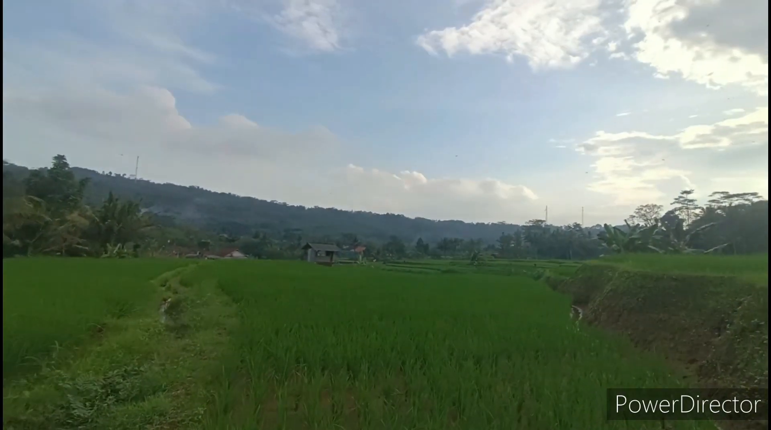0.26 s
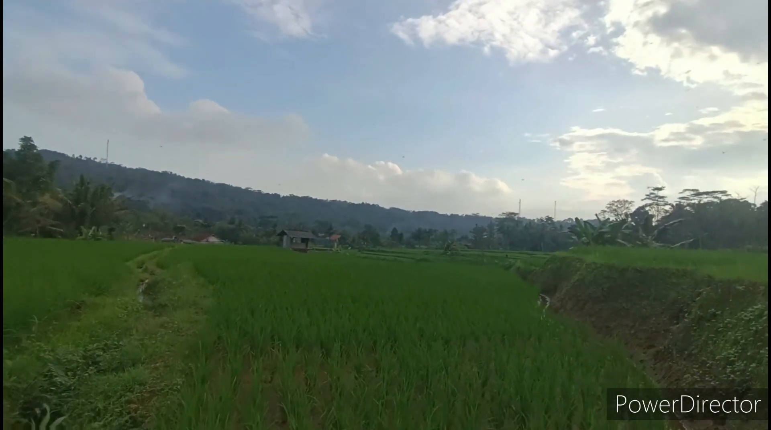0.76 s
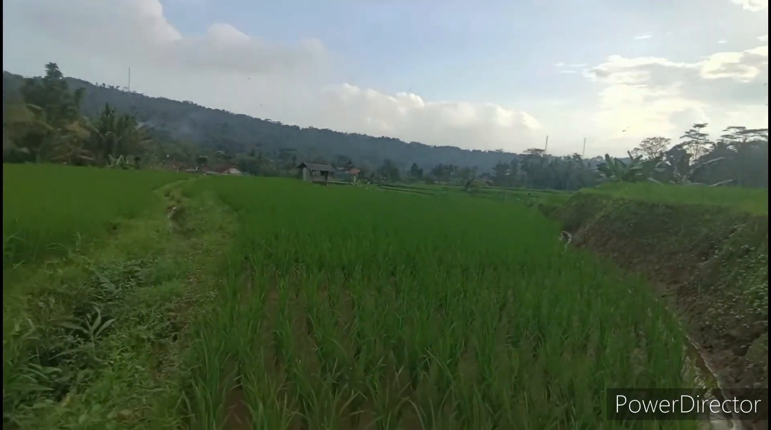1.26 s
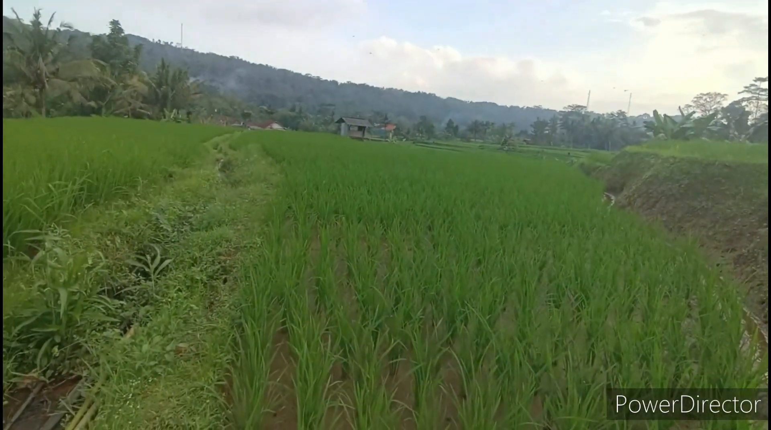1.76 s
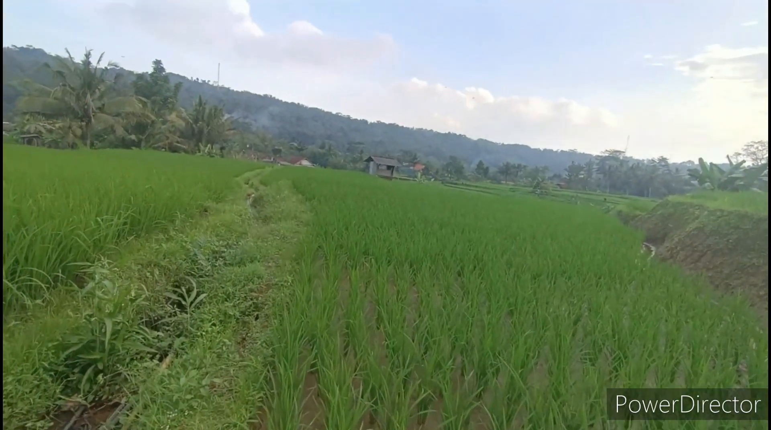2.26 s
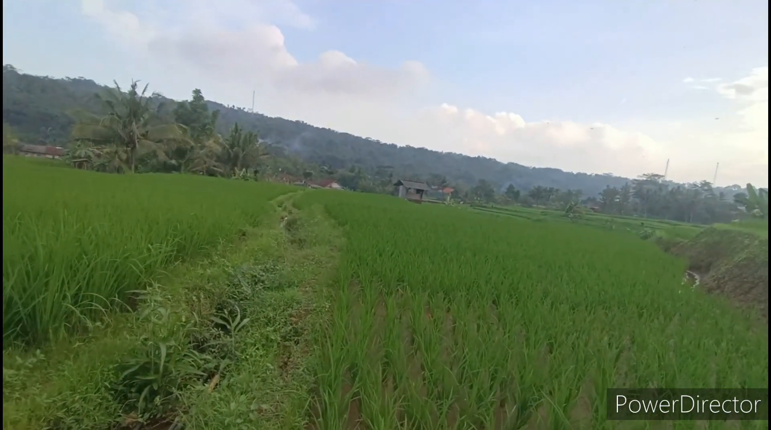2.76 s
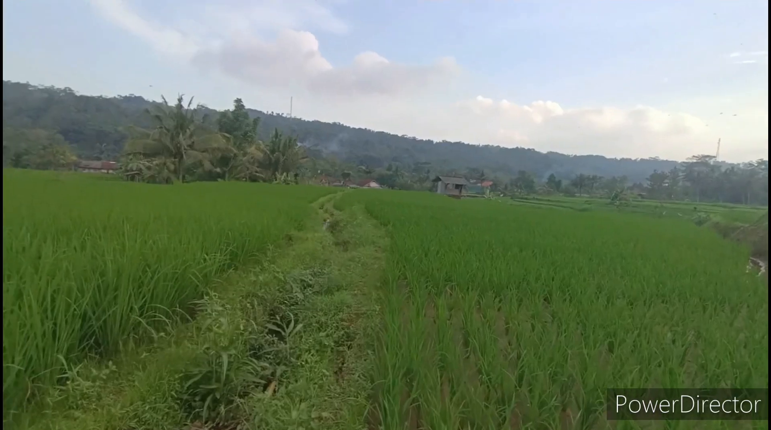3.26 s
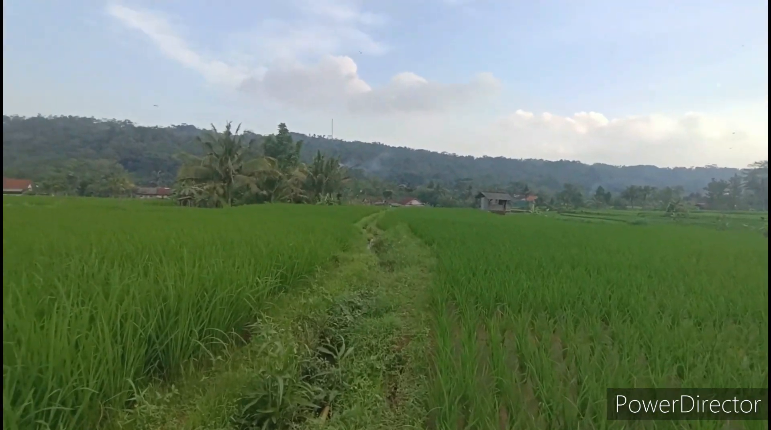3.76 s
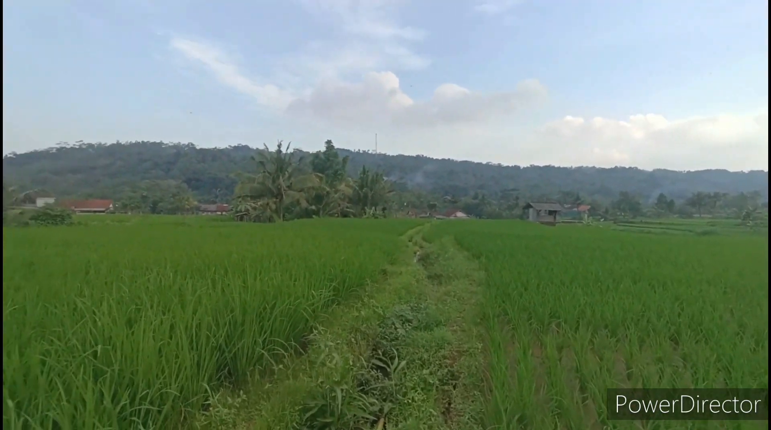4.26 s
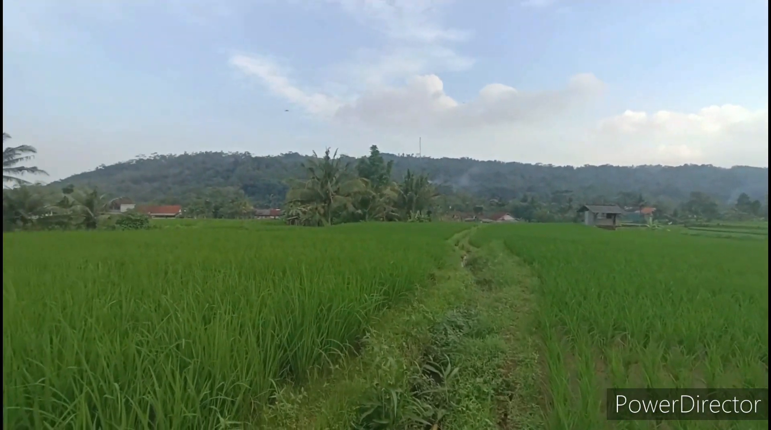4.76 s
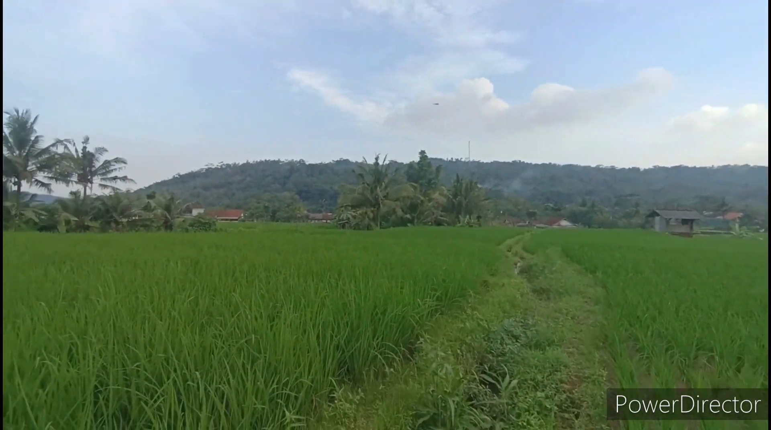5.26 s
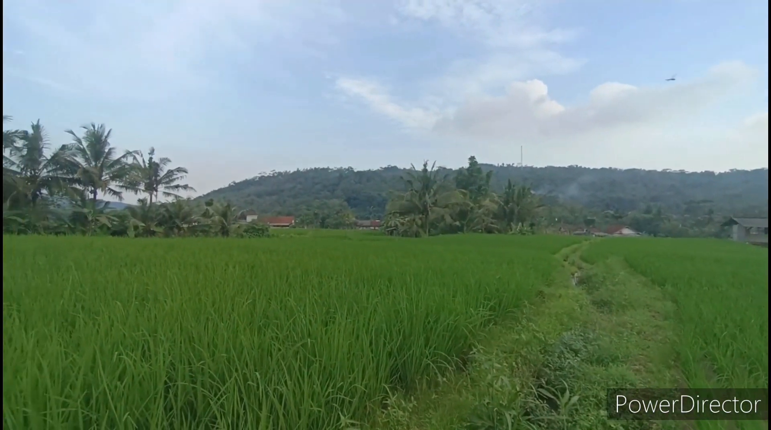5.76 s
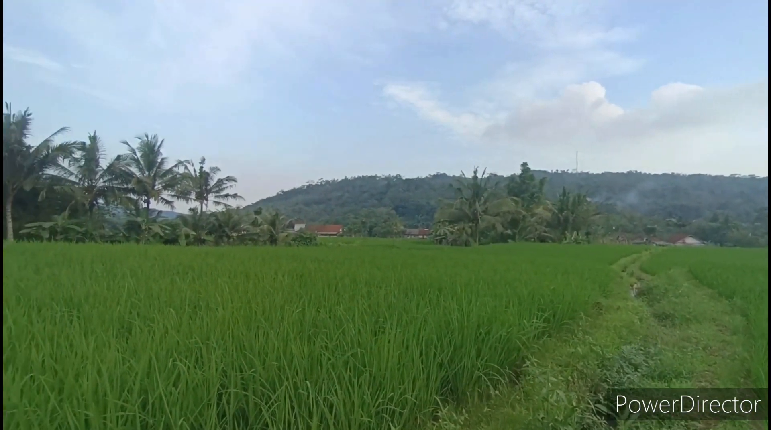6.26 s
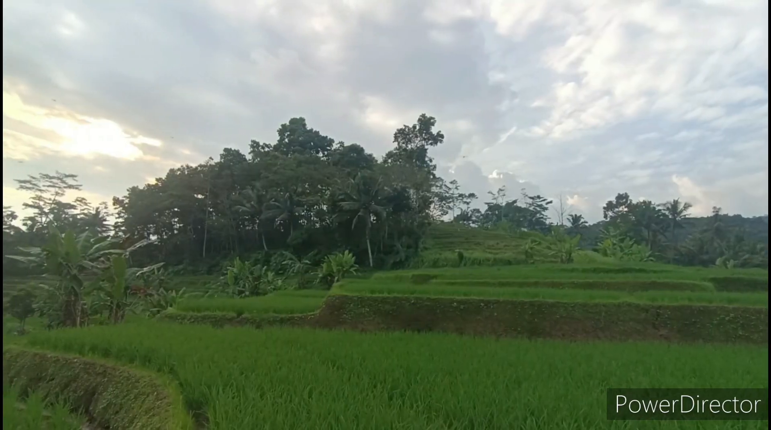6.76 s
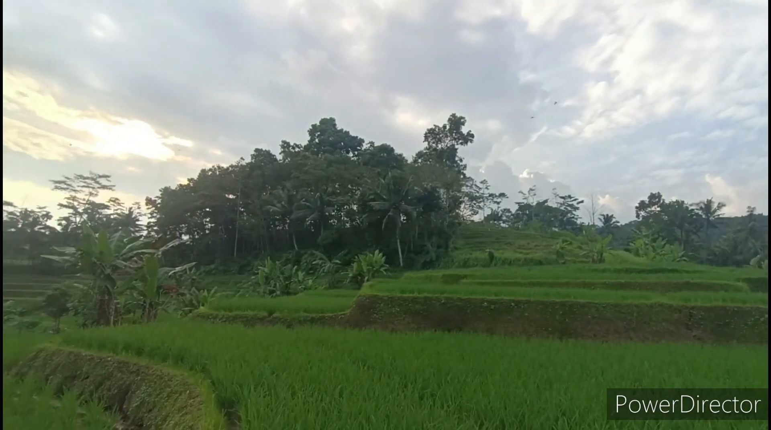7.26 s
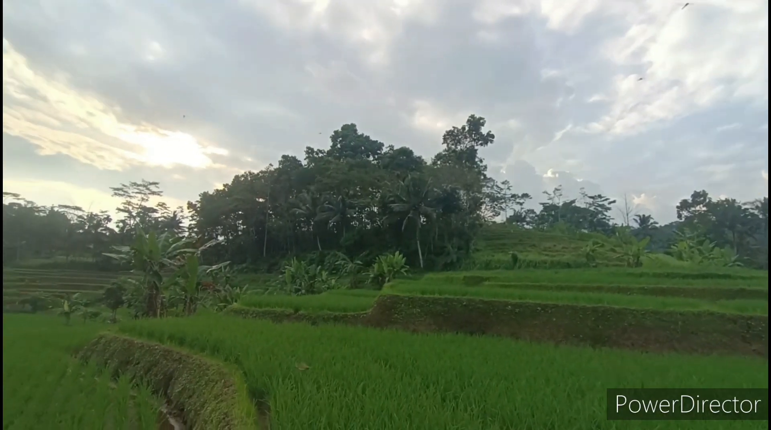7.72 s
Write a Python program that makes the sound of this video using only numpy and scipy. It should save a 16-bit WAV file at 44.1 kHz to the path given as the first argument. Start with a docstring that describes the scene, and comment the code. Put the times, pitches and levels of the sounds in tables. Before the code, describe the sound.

Water gurgles and babbles down a narrow ditch close by, with plops and splashes, cuts off abruptly, then a faint distant water hiss follows.

```python
"""Water runs down a narrow ditch between rice fields, on the left at first: big air pockets gurgle,
small bubbles babble, spray crackles and a little spill splashes; gulps, slops, smacking drops and plops follow.
From about 3.6 s the right side changes colour, the spill swells and the sound drifts to the middle.
At 6.5 s it is cut off; after half a second of silence, a soft hiss of filtered noise and faint bubbles
is water far away across the terraces, with the low random rumble of a light breeze that soon freshens."""
import sys
import numpy as np
from scipy import signal
from scipy.fft import rfft, irfft, next_fast_len
from scipy.io import wavfile
from scipy.ndimage import map_coordinates

SR = 44100
rng = np.random.default_rng(int(sys.argv[2]) if len(sys.argv) > 2 else 0)


def generate_wav(signal):
    """Clip the signal to [-1, 1] and save it as 16-bit WAV at the path in sys.argv[1]."""
    frames = np.transpose(np.atleast_2d(signal))
    scaled = np.clip(frames, -1, 1) * 32767
    pcm = np.round(scaled).astype(np.int16)
    wavfile.write(sys.argv[1], SR, pcm)


N = 352340  # samples, about 8 s

# All levels and colours below hold before record() gives the two sides their final colour.


def amp(db):
    """Turns decibels into a gain."""
    return 10 ** (np.asarray(db) / 20)


def unit(x):
    """Scales a sound to an average (rms) strength of 1."""
    return x / np.sqrt(np.mean(x ** 2) + 1e-20)


def along(points, hz):
    """Reads a curve of (frequency, value) points on a logarithmic frequency axis."""
    point_hz, value = np.transpose(points)
    return np.interp(np.log(hz + 1), np.log(point_hz + 1), value)


def curves(rows):
    """Draws straight lines over time through each column after the first, one value per sample."""
    seconds, *columns = np.transpose(rows)
    t = np.arange(N) / SR
    return [np.interp(t, seconds, column) for column in columns]


def wobble(rate):
    """A smooth random curve with rate random points a second."""
    points = rng.standard_normal(int(N * rate / SR) + 4)
    return map_coordinates(points, [np.arange(N) * rate / SR], order=2)


def filtered(x, response):
    """Multiplies the spectrum of x by a response that depends on frequency."""
    padded = 2 * next_fast_len((N + SR // 4) // 2)  # room for the tail
    hz = np.fft.rfftfreq(padded, 1 / SR)
    return irfft(rfft(x, padded) * response(hz), padded)[..., :N]


def coloured(x, spectrum):
    """Lays a colour on x and scales it to strength 1."""
    return unit(filtered(x, lambda hz: amp(along(spectrum, hz))))


def wash(alike):
    """White stereo noise; a shared and an opposed part set how alike its sides are at each frequency."""
    def mix(hz):
        angle = np.arccos(np.clip(along(alike, hz), -1, 1)) / 2
        return np.array([np.cos(angle), np.sin(angle)])
    mid, side = filtered(rng.standard_normal((2, N)), mix)
    return unit(np.array([mid + side, mid - side]))


def delayed(x, ms):
    """Makes x late by a steady or moving time."""
    return map_coordinates(x, [np.arange(N) - ms * SR / 1000], order=3)


def ring(turns, life, rise):
    """A bubble against its cycles since birth: it starts fast, dies over life cycles and rises in pitch."""
    age = np.maximum(turns, 0) / life
    envelope = (1 - np.exp(-8 * age)) * np.exp(-age)
    return envelope * np.sin(2 * np.pi * life * age * (1 + rise * age))


def bubbles(low_hz, high_hz, life, scatter_db, spread_ms, count, size):
    """A stereo swarm of bubbles, each with its own moment, pitch, strength, damping and place."""
    when, pitch, strength, place, damping, sign = rng.random((count, 6)).T[..., None]
    hz = low_hz + (high_hz - low_hz) * pitch
    gain = amp(-scatter_db * np.log(strength + .01)) * np.sign(sign - .5) * np.sqrt(hz)
    index = (when * N).astype(int) + np.arange(size)
    lag = (place - .5) * spread_ms / 1000  # a bubble off the middle reaches one side later
    t = np.arange(size) / SR
    swarm = []
    for side in (1, -1):
        rings = gain * ring(hz * (t - abs(lag) + side * lag), life * (.5 + damping), rise=0.012)
        swarm.append(np.bincount(index.ravel(), rings.ravel(), N)[:N])
    return unit(np.array(swarm))


def churn(surge_db, flutter_db):
    """Turbulence in dB: quick surges with a finer flutter inside them."""
    return surge_db * wobble(60) + flutter_db * wobble(260)


def splashes(scatter_db, t60, count):
    """Power of many small splashes, mean 1: each starts at once and falls 60 dB in t60 seconds."""
    when, strength = rng.random((count, 2)).T
    start_power = amp(-scatter_db * np.log(strength + .04)) ** 2
    starts = np.bincount((when * N).astype(int), start_power, N)
    power = signal.lfilter([1], [1, -amp(-60 / (t60 * SR)) ** 2], starts)
    return power / power.mean()


def bell(crest_s, length_s):
    """Swells to 1 at the crest and sinks again."""
    return np.exp(-(2 * (np.arange(N) / SR - crest_s) / length_s) ** 2)


# Likeness of left and right in the near water's noise: (frequency [Hz], likeness [0-1])
NEAR_LIKENESS = [(100, .9), (450, .89), (620, .76), (1100, .84), (2000, .88), (2900, .58), (5000, .62),
                 (9000, .2)]


def ditch():
    """Three sizes of bubble share the same surges; splashes also strengthen the two smaller sizes."""
    surge = churn(surge_db=2.0, flutter_db=0.5)
    splash = splashes(scatter_db=-0.5, t60=0.099, count=1000)
    return gurgle(surge) + babble(surge, splash) + spray(surge, splash)


# Colour of the large air pockets: (frequency [Hz], gain [dB])
GURGLE_COLOUR = [(60, -44.5), (105, -16.5), (135, -6), (160, 2.1), (185, -1.2), (250, -2), (370, -4),
                 (445, 0), (530, -4), (610, -12.5), (900, -8.5), (2000, -59)]


def gurgle(surge):
    """Large air pockets sound low between the banks, on a wash of countless weaker ones."""
    pockets = bubbles(117.0, 680, life=3.2, scatter_db=0.0, spread_ms=0.2, count=2400, size=1300)
    mix = pockets + amp(13.0) * wash(NEAR_LIKENESS)
    flow = coloured(mix, GURGLE_COLOUR) * amp(0.47 * surge)
    return amp(-42 + heaving()) * unit(flow)


# Colour of the small bubbles: (frequency [Hz], gain [dB])
BABBLE_COLOUR = [(300, -25), (550, -6), (760, 0.5), (960, -4), (1170, 2), (1400, -2.5), (1900, -3),
                 (2500, -4), (3200, -9), (5000, -20), (10000, -61.5)]
# The babble rises slightly, then recedes: (time [s], level [dB])
BABBLE_LEVELS = [(0, -39), (1.3, -38), (2.5, -37), (3.3, -38), (4.2, -39.5), (5.5, -40), (6.45, -41)]


def babble(surge, splash):
    """Small bubbles ring in the middle range and grow stronger with each splash."""
    small = bubbles(486.3, 2814, life=7.74, scatter_db=1.17, spread_ms=0.1, count=4200, size=1000)
    mix = small + amp(10.0) * wash(NEAR_LIKENESS)
    flow = coloured(mix, BABBLE_COLOUR) * amp(0.5 * surge) * np.sqrt(1 + 0.29 * splash)
    level_db, = curves(BABBLE_LEVELS)
    return amp(level_db) * unit(flow)


# Colour of the tiniest bubbles: (frequency [Hz], gain [dB])
SPRAY_COLOUR = [(1000, -27), (2300, -3.5), (3000, 2), (3900, 1), (5000, 2), (7000, -2.5), (10000, -5.5),
                (13000, -8), (16000, -15.5)]


def spray(surge, splash):
    """The tiniest bubbles crackle high up, with the splashes and in brief spits of their own."""
    crackle = bubbles(2500, 15180, life=11.4, scatter_db=3.5, spread_ms=0.091, count=14000, size=220)
    spits = splashes(scatter_db=2.0, t60=0.02, count=1800)
    bursts = amp(0.75 * surge) * np.sqrt(1 + 0.48 * splash + .22 * spits)
    mix = crackle + amp(4.0) * wash(NEAR_LIKENESS)
    level_db = -40.5 + drift(depth_db=0.5)
    return amp(level_db) * unit(coloured(mix, SPRAY_COLOUR) * bursts)


def drift(depth_db):
    """Running water is never quite even: a slow random wander in dB."""
    return depth_db * wobble(7)


# Colour of the spill's splashing: (frequency [Hz], gain [dB])
SPILL_COLOUR = [(300, -32), (440, -2), (580, -26.5), (800, -9.5), (1200, -5), (1500, -1), (1730, -5),
                (1900, 0.5), (2200, -4), (2900, -8), (3900, -17), (5200, -19.5), (9000, -32.5)]
# Likeness of left and right in the spill's noise: (frequency [Hz], likeness [0-1])
SPILL_LIKENESS = [(450, .89), (620, .75), (1900, .82), (2300, .3), (5000, .3), (9000, .1)]
# The spill's splashing, before the heaves lift it: (time [s], level [dB])
SPILL_LEVELS = [(0, -42.5), (2.1, -44), (3, -42), (4.5, -36.5), (5.3, -41), (6.15, -37.5), (6.45, -44.5)]


def spill():
    """Water tips over a small step and drives middling bubbles under; a few small ones tinkle clear."""
    swarm = bubbles(758, 2308, life=5.4, scatter_db=1.0, spread_ms=0.12, count=6000, size=600)
    bursts = np.sqrt(0.5 + 0.27 * splashes(scatter_db=6, t60=0.033, count=1000))
    splash = coloured(swarm + amp(5.5) * wash(SPILL_LIKENESS), SPILL_COLOUR) * bursts
    trickle = bubbles(1300, 4800, life=16, scatter_db=0.5, spread_ms=0.069, count=400, size=1400)
    level_db = curves(SPILL_LEVELS)[0] + 0.18 * heaving()  # takes on a share of each heave
    return amp(level_db) * unit(splash) + amp(-52) * trickle


# Colour of the low rumble, near and far: (frequency [Hz], gain [dB])
RUMBLE_COLOUR = [(15, -23), (28, -11.5), (40, -0.5), (56, -9.5), (80, -5), (105, -5.5), (200, -9.5),
                 (600, -61.5)]


def near_rumble():
    """A steady, faint low rumble of noise, nearly the same on both sides."""
    return amp(-56.5) * coloured(wash([(50, 0.94)]), RUMBLE_COLOUR)


# Big air pockets gulp under the bank: (time [s], level [dB], pitch [Hz])
GULP_EVENTS = [(0.245, -31, 268), (0.297, -36, 160), (0.375, -33.5, 255), (0.442, -34, 460),
               (0.505, -37, 470), (0.808, -34, 472), (1.128, -33, 175), (1.184, -33, 460),
               (1.472, -31, 164), (1.542, -30.5, 507), (1.612, -30, 467), (1.726, -34, 158),
               (2.372, -35, 167), (2.473, -33, 190), (2.512, -32, 459), (2.672, -31, 396),
               (2.683, -32.5, 159), (2.917, -30.5, 453), (2.951, -31, 160), (3.417, -30, 167),
               (3.707, -32, 190), (3.777, -36.5, 176), (4.153, -28, 438), (4.156, -29.5, 160),
               (4.248, -29, 170), (4.459, -31, 445), (4.611, -33, 235), (4.756, -31.5, 449),
               (5.399, -30.5, 171), (5.739, -32.5, 417), (5.81, -35, 440), (6.086, -28.5, 455),
               (6.102, -31, 158), (6.252, -34, 185), (6.357, -30.5, 439)]
GULP_S = 0.017  # time in which a gulp sinks to about a third


def gulps():
    """Each big air pocket rings low for a few hundredths of a second."""
    out, t = np.zeros(N), np.arange(SR // 6) / SR
    for s, db, hz in GULP_EVENTS:
        out[round(s * SR):][:len(t)] += amp(db) * ring(hz * t, life=GULP_S * hz, rise=0.013)
    return out


# Colour of the slopping droplets: (frequency [Hz], gain [dB])
SLOP_COLOUR = [(2500, -23), (3800, -2), (4900, 2), (6000, -3.5), (7000, -4), (9500, -10), (13000, -9),
               (16000, -17)]
# Water slops against the bank: (time of crest [s], length [s], level [dB])
SLOP_EVENTS = [(0.268, 0.051, -38), (0.46, 0.044, -41), (1.166, 0.056, -39), (1.258, .025, -45),
               (1.41, .02, -40), (1.495, 0.033, -44), (2.108, 0.048, -38.5), (2.972, 0.024, -36),
               (3.25, 0.027, -38), (3.4, 0.037, -40.5), (3.585, 0.13, -38.5), (3.763, 0.19, -43),
               (4.463, 0.03, -56), (4.746, 0.034, -45.5), (5.222, .03, -46), (5.346, 0.031, -43.5),
               (5.57, 0.062, -43.5), (5.746, .04, -46), (5.907, 0.041, -46.5)]


def slops():
    """Each slop is a brief, bright patter of droplets falling back on the water."""
    droplets = bubbles(3000, 11000, life=8.2, scatter_db=5.0, spread_ms=0.1, count=7000, size=200)
    patter = coloured(droplets + amp(-0.5) * wash(NEAR_LIKENESS), SLOP_COLOUR)
    return sum(amp(db) * bell(s, length) for s, length, db in SLOP_EVENTS) * patter


# Drops smack on the surface: (time [s], level [dB], pitch [Hz]); 3.5 dB is taken off each level
SMACK_EVENTS = [(0.5183, -23.5, 6700), (0.9528, -19, 6960), (1.033, -18.5, 6700), (1.1348, -24, 6740),
                (1.294, -16, 8900), (1.6204, -18.5, 4300), (1.7653, -16.5, 5300), (1.818, -18, 2800),
                (2.2735, -19, 6760), (2.2992, -17, 9790), (2.6472, -18, 4870), (2.971, -27, 8200),
                (3.309, -21, 5650), (3.403, -20, 6980), (3.559, -19.5, 5900), (3.608, -12, 5600),
                (3.723, -16, 6200), (3.902, -17, 8000), (4.095, -21.5, 6700), (4.171, -18, 7450),
                (4.455, -21, 7150), (4.4597, -15.5, 5450), (4.739, -27.5, 5000), (4.745, -23, 5200),
                (4.835, -24, 3840), (4.948, -23.5, 7100), (5.002, -21, 6900), (5.058, -23, 7000),
                (5.214, -24.5, 4030), (5.222, -23, 4600), (5.335, -26, 7100), (5.344, -19, 5700),
                (5.351, -18.5, 8800), (5.43, -19, 9000), (5.579, -20, 4100), (5.738, -22, 3850),
                (5.906, -22.5, 6960), (5.9238, -21, 6800), (6.113, -21, 6940), (6.1762, -19, 5560),
                (6.4428, -26, 6750)]


def smacking_drops():
    """A falling drop smacks as a short burst of noise and leaves a tiny ringing bubble."""
    out, t = np.zeros((2, N)), np.arange(SR // 20) / SR
    dull = signal.butter(2, 9400, fs=SR)  # the smack fades above this many Hz
    for s, db, hz in SMACK_EVENTS:
        noise = signal.lfilter(*dull, rng.standard_normal((2, len(t))))
        smack = noise * amp(-60 * t / 0.023)
        bubble = ring(hz * t, life=5.1, rise=0.013)
        out[:, round(s * SR):][:, :len(t)] += amp(db - 3.5) * (bubble + 0.49 * smack)
    return out


# Single large bubbles: (time [s], level [dB], pitch [Hz]); 3.5 dB is taken off the bubble's level
PLOP_EVENTS = [(0.948, -21, 1100), (1.485, -24, 700), (2.493, -17, 1210), (2.689, -15.5, 950),
               (3.406, -27, 895), (3.817, -23.5, 660), (4.043, -26, 795), (4.265, -21.5, 850),
               (4.415, -18.5, 1160), (4.462, -21, 1220), (4.562, -23, 1030), (4.671, -21.5, 1890),
               (5.187, -22.5, 950), (5.221, -27, 1460), (5.331, -23, 1570), (5.568, -22.5, 2010),
               (5.668, -24, 1860), (5.862, -21.5, 1210), (6.003, -16.5, 1605), (6.175, -24, 1900),
               (6.207, -20, 1450), (6.433, -20.5, 797)]
# Colour of the small splash around a plop: (frequency [Hz], gain [dB])
SPLAT_COLOUR = [(250, -20.5), (500, -5.5), (900, -6.5), (1400, -3.5), (2000, 0.5), (2800, -17.5),
                (6000, -27.5)]
PLOP_S = 0.0041  # time in which a plop sinks to about a third
SPLAT_DB, SPLAT_T60 = -13.5, 0.033  # splash against the table's level; time to fall 60 dB (s)


def plops():
    """A large bubble rings briefly inside a small splash of fading noise."""
    rings, splats, t = np.zeros(N), np.zeros(N), np.arange(SR // 20) / SR
    for s, db, hz in PLOP_EVENTS:
        start = round(s * SR)
        rings[start:][:len(t)] += amp(db - 3.5) * ring(hz * t, life=PLOP_S * hz, rise=0.0071)
        splats[start:][:len(t)] += amp(db + SPLAT_DB - 60 * t / SPLAT_T60)
    return rings + splats * coloured(wash(NEAR_LIKENESS), SPLAT_COLOUR)


# The water heaves up for a moment: (time of crest [s], length [s], rise [dB])
HEAVE_EVENTS = [(1.844, 0.66, 1), (2.75, 0.78, 1), (3.803, 0.15, 1.5), (4.2, 0.28, 1.5), (4.85, 0.44, 1.5),
                (6.25, 0.35, 1)]


def heaving():
    """How far the heaves lift the flow, in dB."""
    return sum(db * bell(s, length) for s, length, db in HEAVE_EVENTS)


def causal(spectrum, hz):
    """A filter with the given gains that responds as early as it can (minimum phase)."""
    cepstrum = irfft(np.log(amp(along(spectrum, hz))))
    cepstrum[1:len(hz) - 1] *= 2
    cepstrum[len(hz):] = 0
    return np.exp(rfft(cepstrum))


# Three successive colours of the right side as it opens to the water: (frequency [Hz], gain [dB])
GRAZING_COLOUR = [(200, 0), (450, 0.6), (600, 0), (800, 4.5), (1200, 2), (1900, 4), (2300, -7),
                  (2850, -1.5), (3900, 6.5), (5100, 6), (6300, -3), (7200, 6.5), (9000, 2), (12000, 4)]
OBLIQUE_COLOUR = [(200, 0.5), (450, 3.5), (600, -5.5), (800, 3.5), (1200, 4), (1900, 6), (2300, 0),
                  (2850, -2.5), (3900, 9), (5100, 4.5), (6100, -1), (7200, 3.5), (8500, 1.5)]
FACING_COLOUR = [(200, 2), (450, 1.5), (620, 2), (1200, 6.5), (1900, 6), (2300, -4.5), (2900, -4),
                 (3900, 4.5), (4600, -0.5), (5700, 6.5), (6800, 6.5), (7700, -5.5), (8600, 2.5)]


def opening(x, stage):
    """Glides from the plain sound (stage 0) through the three colours (stages 1 to 3)."""
    versions = [x]
    for gains in (GRAZING_COLOUR, OBLIQUE_COLOUR, FACING_COLOUR):
        versions.append(filtered(x, lambda hz: causal(gains, hz)))
    stage = np.clip(stage, 0, len(versions) - 1)
    return sum(np.maximum(1 - abs(stage - k), 0) * version for k, version in enumerate(versions))


# The water moves to the middle: (time [s], lead of the left side [ms], colour stage of the right side,
# held within 0 plain, 1 grazing, 2 oblique, 3 facing)
DRIFT_TO_MIDDLE = [(0, 0.18, -0.5), (1.3, 0.25, 0), (2.4, 0.25, 0), (3.1, 0.2, 0), (3.65, 0.15, 0.1),
                   (4.2, 0.14, 1), (4.55, 0.1, 0.9), (5.15, 0.1, 2), (5.6, 0.032, 2), (6.05, 0.01, 2.5),
                   (6.45, 0.0045, 3.5)]


def near_water():
    """The earlier side seems nearer: the left leads at first, and its lead shrinks almost to nothing."""
    lead_ms, stage = curves(DRIFT_TO_MIDDLE)
    left, right = ditch() + spill() + gulps() + slops() + smacking_drops() + plops()
    return np.array([left, delayed(opening(right, stage), lead_ms)]) + near_rumble()


# Colour of the far water: (frequency [Hz], gain [dB])
FAR_COLOUR = [(20, -8), (40, -5), (60, -4), (80, 3.5), (110, -9), (165, 0), (300, -3), (450, -4.5),
              (650, -8.5), (1400, -8), (2200, -11), (3200, -17.5), (5500, -19.5), (6800, -22.5),
              (8500, -23.5), (15500, -38)]
# Likeness of left and right in the far water's noise: (frequency [Hz], likeness [0-1])
FAR_LIKENESS = [(40, 1), (150, 1), (320, 1), (600, 0.25), (1100, 0.59), (2500, 0.19), (6000, 0.072)]
# The far water is brighter on the right: (frequency [Hz], right minus left [dB])
FAR_BALANCE = [(2000, 1), (3500, 3), (5500, 5), (7500, 5)]


def far_water():
    """From afar and off to the right the bubbles almost merge into a soft, dull hiss."""
    burble = bubbles(1200, 2800, life=8.7, scatter_db=2.5, spread_ms=0.5, count=1400, size=1000)
    rush = coloured(wash(FAR_LIKENESS) + amp(-20.0) * burble, FAR_COLOUR)

    def balance(hz):
        right_db = along(FAR_BALANCE, hz)
        return amp(np.array([-right_db, right_db]) / 2)
    rush = filtered(rush, balance)
    left, right = rush * amp(-50.0 + churn(surge_db=-0.5, flutter_db=0.5))
    return np.array([delayed(left, ms=0.44), right])


# Light wind, around which a random wobble plays: (time [s], level [dB])
BREEZE_LEVELS = [(7, -67), (7.7, -66), (7.9, -57)]


def breeze():
    """A light wind is low rumbling noise with a wobbling level, only partly alike on both sides."""
    level_db = curves(BREEZE_LEVELS)[0] + 1.5 * wobble(4.5)
    return amp(level_db) * coloured(wash([(50, 0.58)]), RUMBLE_COLOUR)


CUT, RESUME = 6.464, 6.987  # (s) the near water ends, the far water begins


def scene():
    """Near water, a silent pause, then far water in a breeze."""
    t = np.arange(N) / SR
    return near_water() * (t < CUT) + (far_water() + breeze()) * (t > RESUME)


# Each side has its own peaks and notch: (frequency [Hz], gain [dB])
LEFT_COLOUR = [(500, 3), (3500, -1), (5000, -4), (5700, -3), (6850, -15.5), (7600, -3), (8500, 4.5),
               (9700, 9), (11300, 0.5), (12600, 5.5), (14000, -1.5), (15400, -21)]
RIGHT_COLOUR = [(500, 2), (3300, -0.5), (3900, -0.5), (4500, 0.5), (5900, 3.5), (6800, 10.5), (8000, -0.5),
                (9000, -14), (10000, -33.5), (11000, -13), (12000, -0.5), (12800, 3), (14000, 4.5),
                (15300, 12.5)]
TOP_HZ = 15650  # the sound ends steeply above this


def record(dry):
    """Colours the two sides differently, most of all in the treble, and removes the very top."""
    def response(hz):
        low_pass = 1 / (1 + (hz / TOP_HZ) ** 200)
        return amp([along(LEFT_COLOUR, hz), along(RIGHT_COLOUR, hz)]) * low_pass
    return filtered(dry, response)


dry = scene()
out = record(dry)
generate_wav(out)
```